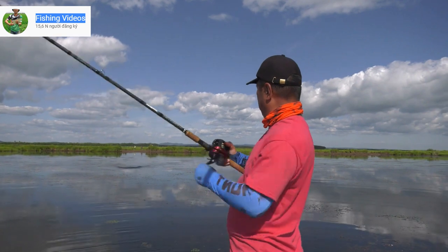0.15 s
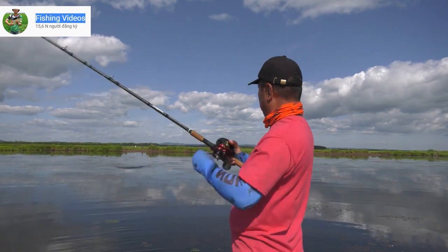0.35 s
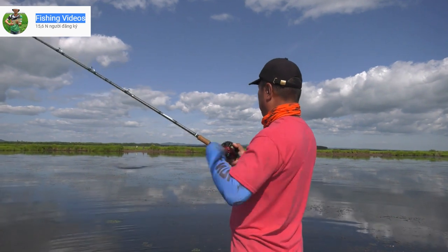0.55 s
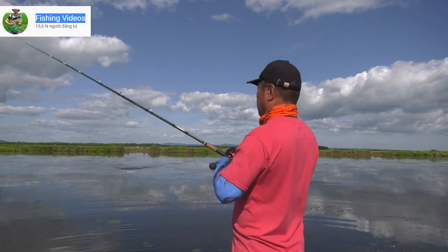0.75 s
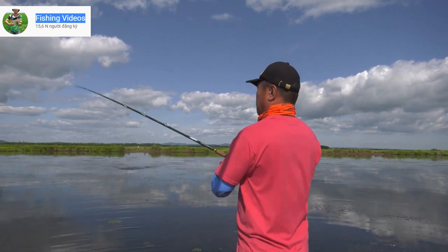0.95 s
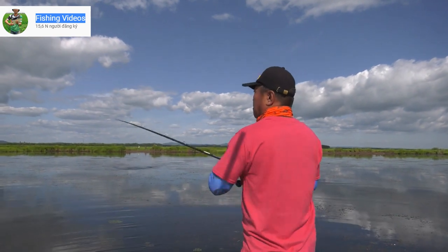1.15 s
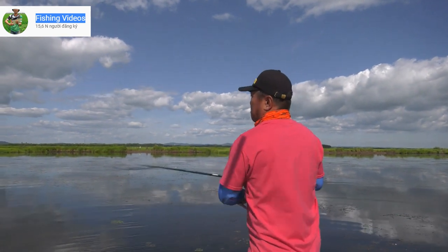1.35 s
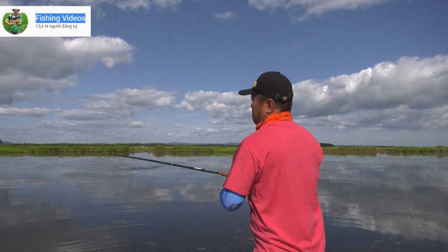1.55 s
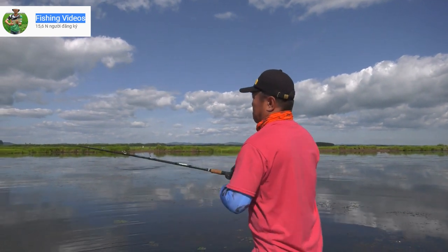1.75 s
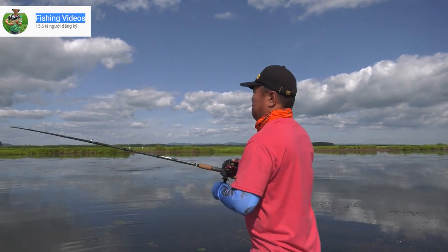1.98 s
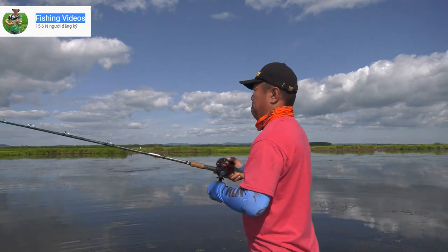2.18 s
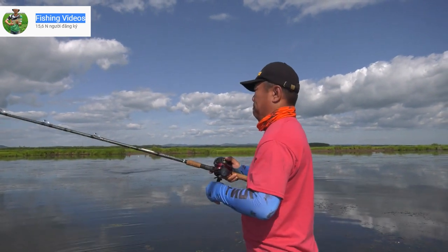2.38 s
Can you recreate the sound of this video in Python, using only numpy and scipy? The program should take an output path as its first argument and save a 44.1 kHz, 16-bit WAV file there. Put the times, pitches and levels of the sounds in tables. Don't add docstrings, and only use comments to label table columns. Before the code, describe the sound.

A pole knocks and rasps against the hollow hull of a small boat on calm water

```python
import sys
import numpy as np
from scipy import signal
from scipy.fft import rfft, irfft
from scipy.io import wavfile
from scipy.ndimage import uniform_filter1d

SR = 44100
rng = np.random.default_rng(int(sys.argv[2]) if len(sys.argv) > 2 else 0)


def voltage_ratio(level):
    return 10 ** (np.asarray(level, float) / 20)


def dump(signal):
    limited = np.clip(np.atleast_2d(signal).T, -1, 1)
    pcm = np.round(limited * 32767).astype(np.int16)
    wavfile.write(sys.argv[1], SR, pcm)


N = 110250


def evened(x):
    return x / np.sqrt(np.mean(abs(x) ** 2) + 1e-20)


def read(points, hz):
    f, value = np.transpose(points)
    return np.interp(np.log(hz + 1), np.log(f + 1), value)


def add(mix, start, sound):
    at = round(start * SR)
    sound = sound[max(-at, 0):]
    part = mix[max(at, 0):][:len(sound)]
    part += sound[:len(part)]


def resonate(x, hz, width):
    pole = np.exp((2j * hz - width) * np.pi / SR)
    return 2 * signal.lfilter([1 - abs(pole)], [1, -pole], x).real


def resonate_twice(x, hz, width):
    return resonate(resonate(x, hz, width), hz, width)


def highpass(x, hz):
    return signal.lfilter(*signal.butter(2, hz / (SR / 2), "high"), x)


def arch(length, edge):
    u = np.linspace(0, 1, max(round(length * SR), 2))
    slope = np.minimum(u, 1 - u) / np.clip(edge, .02, .5)
    return np.sin(np.pi / 2 * np.clip(slope, 0, 1)) ** 2


def gated(start, length, edge):
    gate = np.zeros(N)
    add(gate, start, arch(length, edge))
    return gate


def grains(per_s, spread_db):
    size = voltage_ratio(spread_db * np.minimum(rng.exponential(1, N), 5))
    happens = rng.random(N) < per_s / SR
    return evened(size * happens * rng.standard_normal((2, N)))


def right_ear(left, other, likeness):
    return likeness * left + np.sqrt(1 - likeness ** 2) * other


def shaped(x, db, same, patch_db):
    hz, _, z = signal.stft(x, SR, nperseg=512, noverlap=384)
    patch = uniform_filter1d(rng.standard_normal(z.shape[1:]), size=6, axis=0)
    patch = evened(uniform_filter1d(patch, size=8, axis=1))
    likeness = np.clip(read(same, hz), -1, 1)[:, None]
    gain = voltage_ratio(read(db, hz)[:, None] + patch_db * patch)
    z = np.array([z[0], right_ear(z[0], z[1], likeness)]) * gain
    return evened(signal.istft(z, SR, nperseg=512, noverlap=384)[1][:, :N])


def ring(modes, swell_cycles):
    t = np.arange(9000) / SR
    tone = np.zeros(len(t))
    for k, (hz, db, t60) in enumerate(modes):
        swell = 1 - np.exp(-t * hz / swell_cycles)
        tone += (-1) ** k * voltage_ratio(db - 60 * t / t60) * np.sin(2 * np.pi * hz * t) * swell
    rattle = evened(resonate_twice(rng.standard_normal(len(t)), 1010, 2260))
    return tone / abs(tone).max() + voltage_ratio(-17.5 - 60 * t / 0.041) * rattle


# start in seconds, peak level in dB, pitch in Hz, t60 in seconds.
BUMPS = [(0.098, -36.5, 337, 0.034), (0.273, -37, 289.4, 0.093), (0.288, -47, 287, 0.12),
         (0.367, -41, 295, 0.034), (0.406, -47, 284, 0.088), (0.432, -43, 300, 0.089),
         (.494, -40.5, 253, 0.052), (.513, -48, 330, 0.029), (.527, -48, 411, 0.026),
         (0.613, -40, 366, 0.026), (0.728, -44.5, 276, 0.036), (.78, -50, 465, 0.035),
         (0.804, -38.5, 458.6, 0.041), (.824, -38, 463, 0.035), (0.816, -40.5, 290, 0.045),
         (0.831, -38, 212, 0.056), (.838, -38, 330, 0.031), (.845, -45, 593, .04), (.854, -42, 190, 0.026),
         (.94, -52.5, 335, 0.042), (1.064, -43.5, 303, 0.054), (1.069, -50, 143, 0.11),
         (1.12, -47.5, 247, 0.04), (1.186, -54, 300, .05), (1.15, -49, 190.4, .08),
         (1.39, -41, 327.7, 0.022), (1.407, -42, 312, 0.0276), (1.418, -36.5, 318, 0.039),
         (1.413, -48, 727, 0.044), (1.427, -47.5, 155, 0.046), (1.428, -46, 523, 0.034),
         (1.452, -54, 650, 0.027), (1.438, -45, 302, 0.055), (1.444, -41.5, 324, 0.072),
         (1.464, -43.5, 296, 0.04), (1.479, -40.5, 330, 0.027), (1.639, -55.5, 300, 0.096),
         (2.426, -42.5, 336, 0.044), (2.456, -53, 320, 0.043)]
# start in seconds, peak level in dB.
BLOWS = [
    (0.457, -21.5),
    (0.4604, -26),
    (0.809, -27),
    (1.591, -35),
    (1.603, -39.5),
    (2.477, -38.5),
    (1.828, -47),
]
# frequency in Hz, level in dB, t60 in seconds.
STERN = [(258, 6.5, 0.074), (369, 6.5, 0.049), (490, -1, 0.043), (650, 1, 0.0525), (821, -12, .03),
         (989, 0.5, 0.053), (1220, -18.5, 0.045), (1547, -4.5, 0.067), (1740, -9.5, 0.039),
         (2200, -7, 0.025), (2790, -16, .02), (3291, -4, 0.0164)]
SIDE_WALL = [(150.3, -4, 0.2), (191, 2.5, 0.1), (284, 3, 0.037), (373, 6.5, .03), (455, 7.5, 0.036),
             (604, -12, 0.103), (890, -23, 0.032), (1255, -25, 0.02)]
BOW = [(199.6, 6.5, 0.0985), (300, 7, 0.16), (500, 2, 0.043), (624.5, 5, 0.053), (785, 8.5, 0.0141),
       (1085, 1, 0.022), (1900, -3, 0.0067)]
RIM = [(330, 10.5, 0.028), (698.6, 3, 0.046), (980, -15, 0.022)]
TAP = [(858, 2.1, 0.038), (1156, 1, 0.02), (1496, 0, 0.02)]


def knocks():
    out = np.zeros(N)
    for start, db, hz, t60 in BUMPS:
        modes = [(hz, 0, t60), (1.32 * hz, -6, 0.3 * t60), (2.11 * hz, -14, 0.57 * t60)]
        add(out, start, voltage_ratio(db) * ring(modes, swell_cycles=1.17))
    places = [STERN, STERN[:2], SIDE_WALL, BOW, BOW, RIM, TAP]
    for (start, db), place in zip(BLOWS, places):
        add(out, start, voltage_ratio(db) * ring(place, swell_cycles=0.29))
    return out


# start in seconds, length in seconds, level in dB, brightness in dB.
STROKES = [(-.04, 0.2385, -60, 6), (0.149, 0.12, -50, 5), (0.291, 0.1031, -45.5, 3),
           (0.406, 0.13, -50.5, 4.5), (0.524, 0.15, -61.5, 10.5), (0.644, 0.165, -51.5, 5),
           (0.788, 0.061, -53.5, 4.5), (0.818, 0.1191, -56, 4), (0.92, 0.14, -60, 2), (1.132, 0.12, -64, 1),
           (1.274, 0.0517, -65.5, 2), (1.32, 0.0536, -69.5, -1.5), (-.5, 2.23, -61, 2.5),
           (1.751, 0.347, -68, 5), (2.121, 0.43, -70.5, 3.5)]
# frequency in Hz, level in dB per Hz.
RASP_COLOUR = [(300, 1), (700, 4.5), (1500, 5.5), (5000, -2), (10500, -16.5), (12500, -23)]
# frequency in Hz, left-right likeness from -1 to 1.
RASP_LIKENESS = [(100, .995), (1500, 0.898), (4000, 0.99), (10000, 0.9)]
# frequency in Hz, width in Hz, level in dB.
POLE_MODES = [(2370, 1320, 8), (3070, 51, 5), (4580, 320, 3.5), (7806, 447, 6.5), (10200, 470, 2)]


def rasp():
    raw = shaped(grains(per_s=20000, spread_db=1.2), RASP_COLOUR, RASP_LIKENESS, patch_db=1.5)
    pole = sum(voltage_ratio(db) * resonate(raw, hz, width) for hz, width, db in POLE_MODES)
    raw = evened(raw + voltage_ratio(-5) * pole)
    high = highpass(raw, 3500)
    low = raw - high
    out = np.zeros((2, N))
    for start, length, db, bright_db in STROKES:
        tilted = voltage_ratio(-bright_db) * low + voltage_ratio(bright_db) * high
        out += gated(start, length, edge=0.35) * voltage_ratio(db) * tilted
    return out


# start in seconds, peak level in dB, centre in Hz, width in Hz, length in seconds.
TICKS = [(0.117, -43, 7400, 3000, 0.00466), (0.221, -35, 2940, 900, .005), (.242, -34, 5100, 1200, 0.0059),
         (0.244, -32, 10200, 2000, 0.00256), (0.273, -34, 2950, 1510, 0.0058),
         (.27, -33.5, 5960, 2500, .008), (.2712, -27.5, 10100, 1800, 0.00412),
         (0.313, -38, 9540, 2500, 0.0023), (0.4937, -39, 3100, 1200, 0.0024), (.5, -35, 2950, 700, 0.0016),
         (.5045, -48, 2900, 900, 0.0026), (0.531, -36, 1810, 2500, 0.0017), (0.535, -43, 2310, 700, 0.0036),
         (0.607, -38, 12500, 5040, .001), (.631, -41, 10200, 2500, .002), (.6928, -38.5, 9900, 1800, .002),
         (.693, -50, 13000, 1800, .0015), (0.7152, -36, 9900, 1800, 0.0025),
         (.7146, -48, 13500, 4000, .0015), (0.7814, -40, 13000, 5000, 0.00103),
         (0.7833, -38, 1900, 1500, 0.017), (.784, -36, 4750, 1500, 0.0062),
         (0.8092, -34, 7900, 2480, 0.0062), (0.809, -33, 4510, 1500, 0.025), (0.811, -41, 6210, 900, 0.01),
         (.8555, -42, 8000, 2000, .002), (.8555, -52, 12000, 2000, .0015),
         (1.015, -48, 5500, 5000, 0.00315), (1.28, -52, 5000, 5000, .003), (1.439, -54, 4650, 3000, 0.0054),
         (1.591, -54.5, 3000, 2500, 0.0025), (1.6025, -47.5, 5200, 1600, 0.0047),
         (1.603, -51, 3000, 2000, .004), (1.5995, -55, 7500, 1200, .004)]


def ticks():
    out, t = np.zeros(N), np.arange(900) / SR
    for start, db, hz, width, length in TICKS:
        grit = rng.standard_normal(len(t)) * np.minimum(t / 0.000493, 1)
        slip = (grit + 1.85 * (t == 0)) * voltage_ratio(-26 * t / length)
        crack = resonate_twice(slip, 0.69 * hz, hz)
        snap = resonate_twice(slip, hz, width) + voltage_ratio(-14) * crack
        add(out, start, voltage_ratio(db) * snap / abs(snap).max())
    return out


# start in seconds, length in seconds, pitch in Hz, level in dB,
# second harmonic in dB.
SQUEAKS = [(0.174, 0.0652, 3070, -54.5, -7), (0.319, 0.051, 1148, -52.5, -4),
           (0.321, 0.0091, 2200, -46.5, -2), (0.631, 0.01475, 2200, -55, 2.5),
           (0.596, 0.051, 1104, -59.5, -0.5), (0.689, 0.043, 4774, -50.5, -32),
           (0.719, 0.027, 1077, -54, -25), (0.843, 0.07, 2250, -55, 0.5), (0.962, 0.06, 2600, -58.5, -7),
           (0.629, 0.12, 135, -60, -23), (0.841, 0.04437, 116, -52, -10), (1.049, 0.066, 134, -60.5, -2.5)]


def squeaks():
    out = np.zeros(N)
    for start, length, hz, db, second_db in SQUEAKS:
        gate, width = arch(length, 0.305), min(91, 0.16 * hz)
        tone = np.zeros(len(gate))
        for k, harmonic_db in ((1, 0), (2, second_db)):
            x = resonate(rng.standard_normal(8000), k * hz, k * width)
            x = resonate(x, k * hz, 3 * k * width)
            tone += voltage_ratio(harmonic_db) * evened(x[-len(gate):])
        add(out, start, voltage_ratio(db) * gate * tone)
    return out


# start in seconds, length in seconds, centre in Hz, width in Hz, level in dB.
SWISHES = [
    (1.85, .42, 4860, 820, -75.5),
    (2.16, 0.343, 7000, 1200, -79),
    (2.2, 0.25, 5340, 600, -79.5),
    (2.1, 0.25, 7600, 1400, -77.5),
    (0.493, 0.18, 3626, 440, -65),
]


def swishes():
    out, grain = np.zeros(N), grains(per_s=3000, spread_db=2.9)[0]
    for start, length, hz, width, db in SWISHES:
        hiss = evened(resonate_twice(grain, hz, width))
        out += voltage_ratio(db) * gated(start, length, edge=0.19) * hiss
    return out


# time in seconds, level in dB.
DRAG_LEVEL = [(0., -55.5), (.2, -61), (.5, -55), (.7, -62), (.95, -59), (1.15, -54.5), (1.3, -56.5),
              (1.45, -56), (1.7, -63.5), (2.348, -63.5), (2.5, -58.5)]
# frequency in Hz, level in dB per Hz.
HULL_COLOUR = [(40, -22.5), (140, -1), (330, -1.5), (800, -8), (1500, -22.5)]


def drag():
    s, db = np.transpose(DRAG_LEVEL)
    hz = np.fft.rfftfreq(N, 1 / SR)
    colour = voltage_ratio(read(HULL_COLOUR, hz) - 60 * (hz > 1500))
    thuds = irfft(rfft(grains(per_s=4000, spread_db=1.2)[0]) * colour, N)
    return evened(thuds) * voltage_ratio(np.interp(np.arange(N) / SR, s, db))


def echoes(x):
    t = np.arange(4000) / SR
    scattered = rng.random((2, len(t))) < .05
    taps = rng.standard_normal((2, len(t))) * scattered * voltage_ratio(-60 * t / 0.122) * (t > .002)
    taps = taps / np.linalg.norm(taps[0])
    return voltage_ratio(-21) * signal.fftconvolve(highpass(x, 450)[None], taps, axes=1)[:, :N]


# frequency in Hz, level in dB per Hz.
AIR_COLOUR = [(25, -48), (130, -2.5), (400, -0.5), (850, -3), (1400, -5.5), (5000, -13), (8000, -18),
              (15800, -16.5)]
# frequency in Hz, left-right likeness from -1 to 1.
AIR_LIKENESS = [(60, 0.18), (700, 0.496), (2000, -0.275), (5000, 0.11), (7000, 0.546), (9000, -0.022),
                (13000, -0.65)]


def air():
    left, other = rfft(rng.standard_normal((2, N)))
    hz = np.fft.rfftfreq(N, 1 / SR)
    likeness = np.clip(read(AIR_LIKENESS, hz), -1, 1)
    both = np.array([left, right_ear(left, other, likeness)])
    return voltage_ratio(-62.5) * evened(irfft(both * voltage_ratio(read(AIR_COLOUR, hz)), N))


def scene():
    body = knocks() + squeaks() + drag()
    snaps = signal.lfilter(*signal.butter(3, 14500 / (SR / 2)), ticks())
    near = body + np.array([np.roll(snaps, shift=1), snaps]) + rasp() + swishes()
    balance = voltage_ratio(np.array([[0.28], [-0.28]]))
    return near * balance + echoes(body + snaps) + air()


def low_pass(x):
    return signal.sosfilt(signal.butter(12, 16450, fs=SR, output="sos"), x)


def record(dry):
    top_cut = signal.firwin(511, 15750, window=("kaiser", 9), fs=SR)
    x = signal.oaconvolve(highpass(dry, 70), top_cut[None], "same")
    return low_pass(x)


dry = scene()
out = record(dry)
dump(out)
```